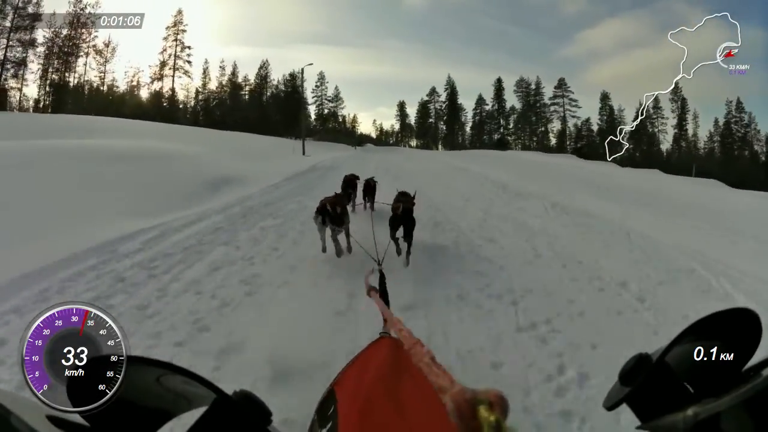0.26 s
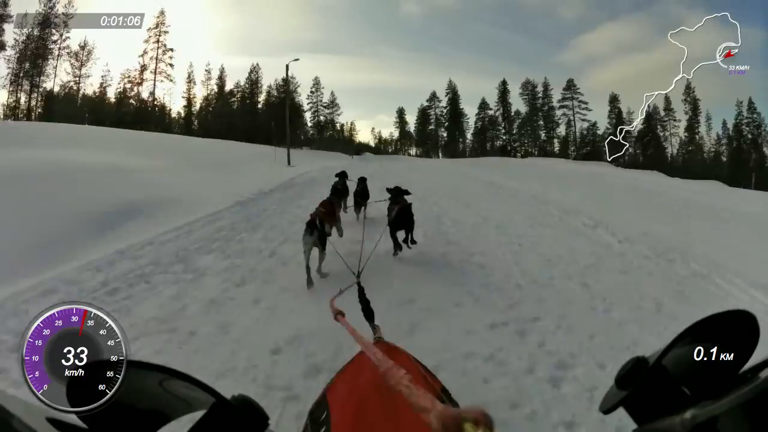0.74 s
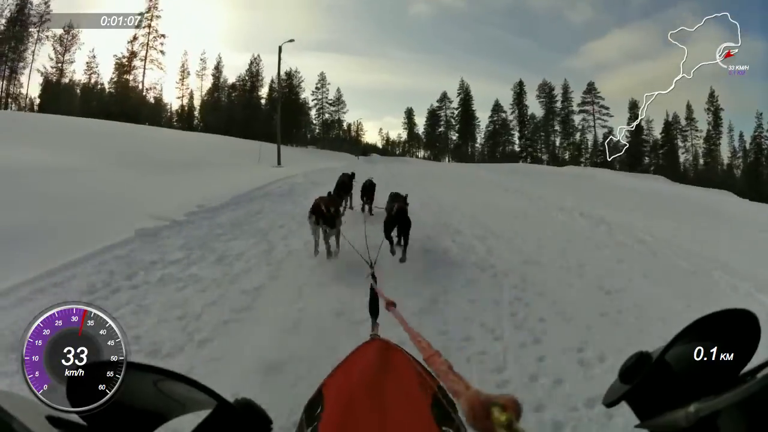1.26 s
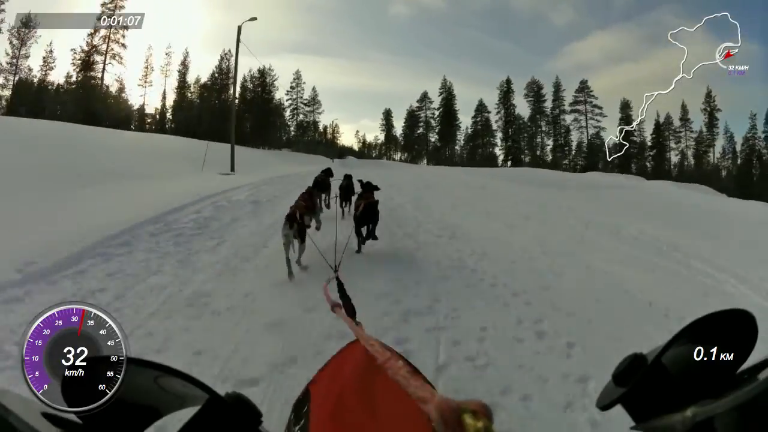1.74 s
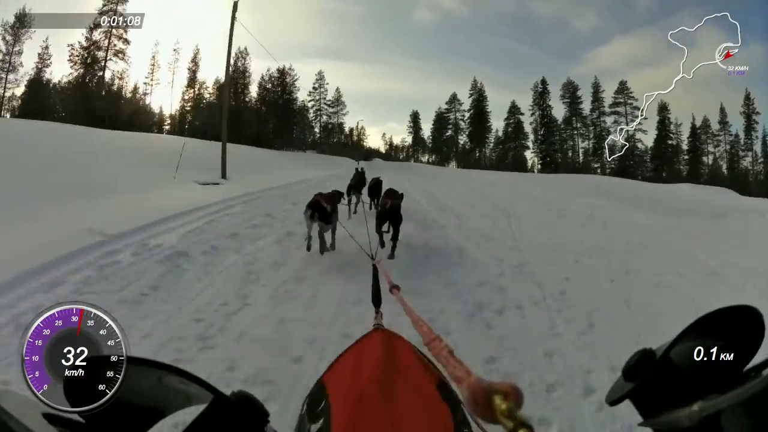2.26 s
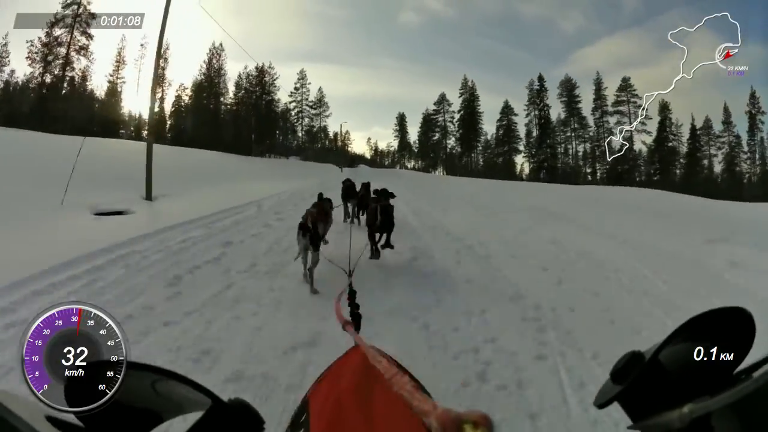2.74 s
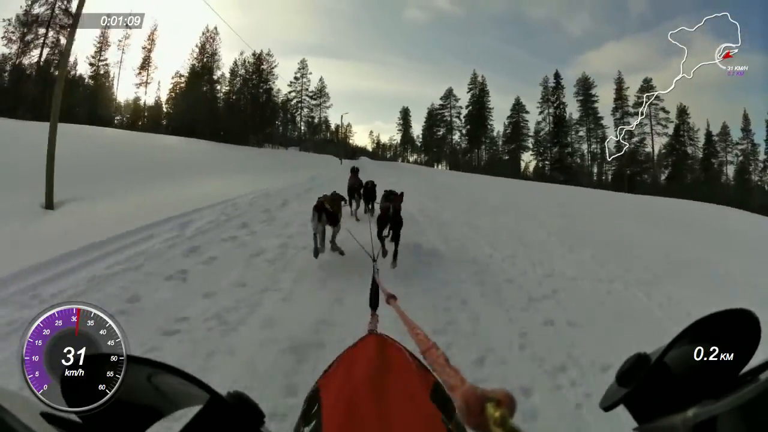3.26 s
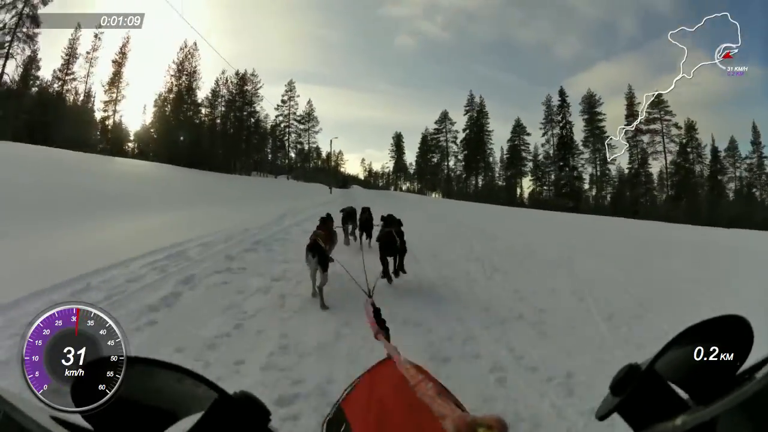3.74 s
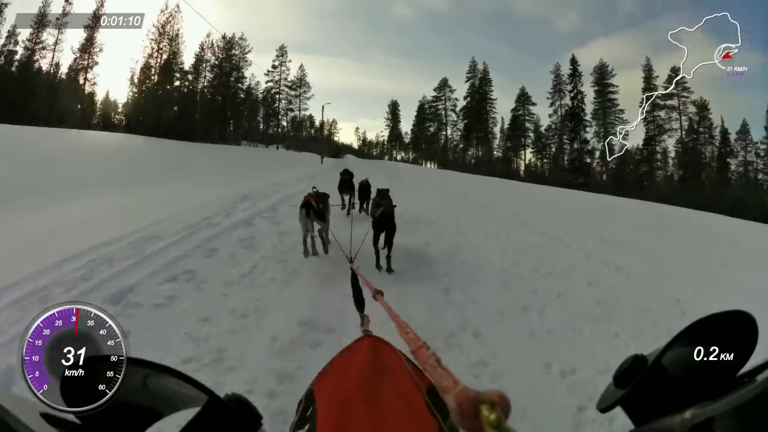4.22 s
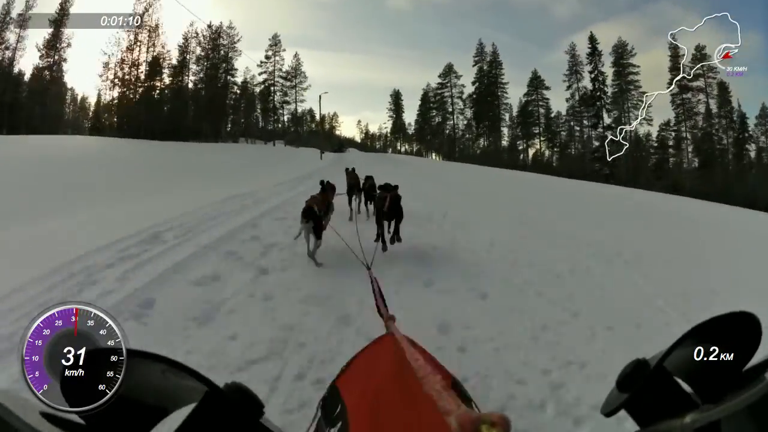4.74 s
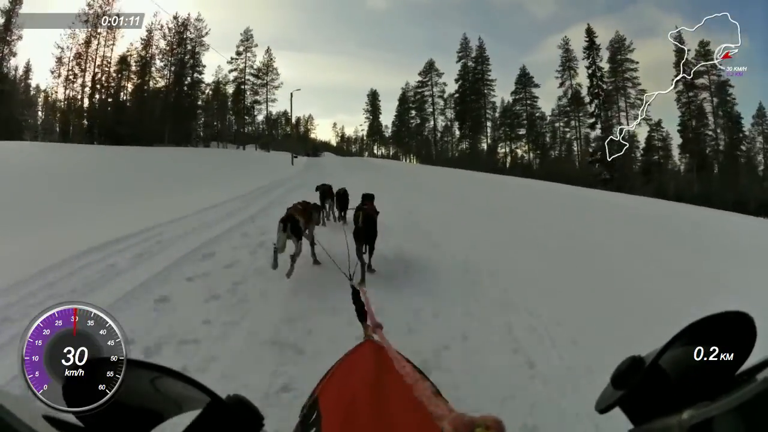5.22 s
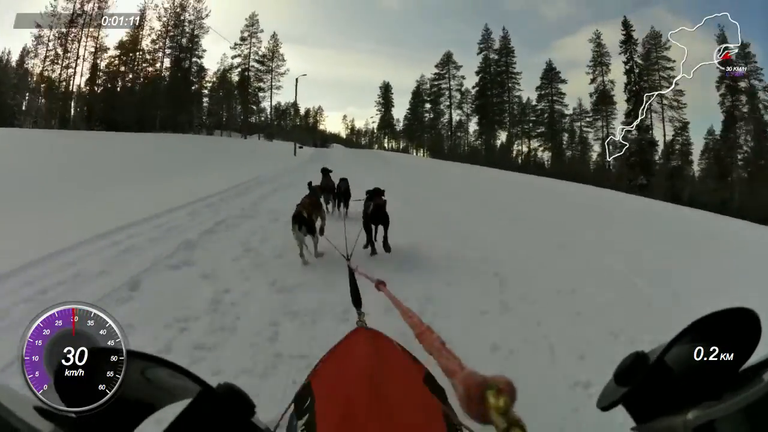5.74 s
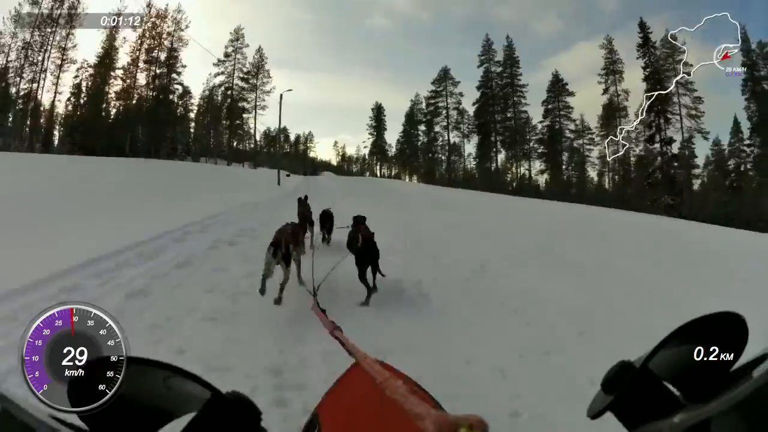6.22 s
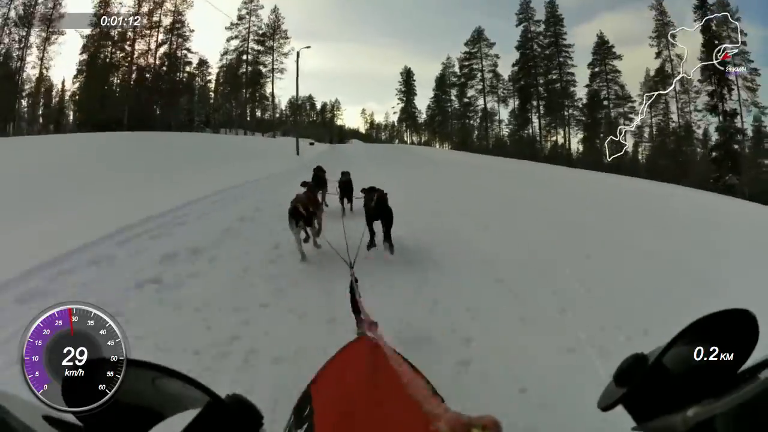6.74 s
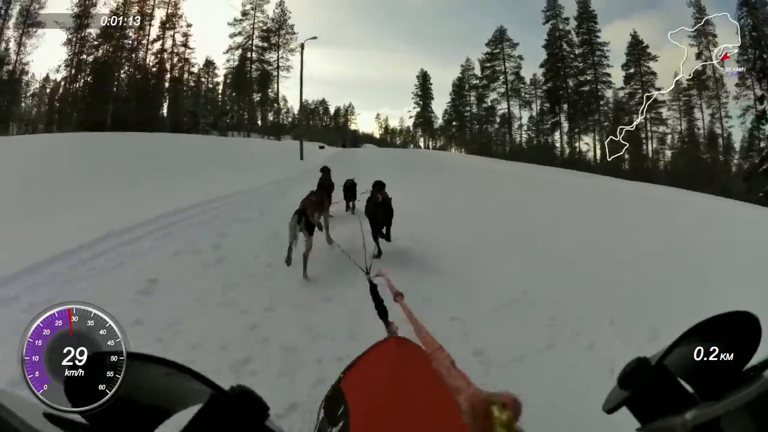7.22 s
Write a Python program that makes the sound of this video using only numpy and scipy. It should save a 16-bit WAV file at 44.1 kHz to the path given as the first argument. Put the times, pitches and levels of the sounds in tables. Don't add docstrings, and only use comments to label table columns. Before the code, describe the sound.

A dog sled races over a packed snow trail, heard from a sealed camera mounted on it. A dull, uneven rumble runs throughout, with gritty scraping and fine crackle. Loose fittings tap, the wooden frame raps, and ice chips tick on the case. Bumps grow harder and denser in the second half, some thumping into distortion, up to heavy slams at the end.

```python
import sys
import numpy as np
from scipy import signal
from scipy.io import wavfile
from scipy.ndimage import uniform_filter1d

SR = 44100
rng = np.random.default_rng(int(sys.argv[2]) if len(sys.argv) > 2 else 0)


def field_ratio(decibels):
    return 10 ** (np.asarray(decibels, dtype=float) / 20)


def unload_wav(signal):
    wavfile.write(
        sys.argv[1],
        SR,
        np.round(np.clip(np.atleast_2d(signal).T, -1, 1) * 32767).astype(np.int16),
    )


N = 329868

# pitch_hz, width_hz, level_db
BODY = [(1146, 525, 3.5), (1658, 93, 1.5), (2182, 380, -3), (2900, 190, -19)]
# pitch_hz, width_hz, level_db
TOP = [(3770, 1460, 2.5), (4460, 260, 4.5), (5400, 950, -1.5), (7050, 360, -30)]
# crest_s, peak_db, pitch_hz
BUMPS = [(0.1029, -6, 325), (1.0114, -6.5, 215), (1.3668, -3, 340), (1.4052, -7, 327), (1.6788, -1, 256),
         (2.286, -8, 364), (2.2998, -0.5, 279), (2.4176, -5, 356), (2.6999, -5, 379), (2.7184, -2, 480),
         (5.3403, -10, 400), (3.1448, -1, 298), (3.2303, 3.5, 254), (3.2618, -4, 249), (3.524, -8, 204),
         (3.6002, -9.5, 345), (3.6579, -4, 236), (3.927, 1, 397), (4.5734, -6.5, 226), (4.6612, -7, 130),
         (4.9402, -4.5, 426), (5.3096, 5, 288), (5.5478, 6, 210), (6.1924, -1.5, 300), (6.3013, -4.5, 169),
         (6.4144, -3, 553), (6.8505, -3.5, 439), (7.1188, -0.5, 217), (7.3756, 5, 304.4),
         (7.4153, -2.5, 269), (7.4425, 7, 244)]
# trough_s, peak_db, pitch_hz
DROPS = [(0.5098, -7.5, 220), (1.5128, -0.5, 158), (3.2438, 0.5, 170), (3.7593, 0, 220), (4.277, -2.5, 400),
         (4.3907, -2.5, 320), (4.7423, -3.5, 386), (4.796, -7, 150), (1.5879, -10, 310),
         (4.751, -11.5, 120), (.992, -4, 160), (2.0765, -3, 230), (6.238, -4.5, 180), (4.469, -8, 100),
         (3.813, -3, 250), (5.5513, -3, 180), (6.1946, -2.5, 240), (4.6555, -7, 110), (8.4, -5, 200),
         (7.4298, 0, 108)]
# start_s, peak_db, struck_hz, sharp_edge_db
BLOWS = [(0.9027, -13.5, 1900, -24.5), (0.9895, -12.5, 1700, -33), (1.4115, -17, 1540, -29),
         (1.511, -22, 2700, -32), (1.5243, -8.5, 1550, -29), (1.53, -21, 1570, -38),
         (2.158, -22, 2230, -43), (2.281, -11, 1520, -18.5), (2.299, -16.5, 1847, -32.5),
         (2.413, -12, 1600, -26), (3, -12.5, 2190, -48), (3.008, -15.5, 2210, -28),
         (3.7532, -15.5, 1680, -28), (3.865, -17, 1620, -48), (3.8715, -14.5, 2200, -44),
         (3.9224, -21, 1400, -59), (4.5301, -11, 1920, -27.5), (4.7282, -4.5, 2280, -17.5),
         (4.735, -8.5, 1564, -42), (4.762, -10, 1680, -27.5), (5.1104, -16, 1720, -50.5),
         (6.4306, -7, 2460, -39), (5.546, -13.5, 1930, -39), (5.661, -7, 1650, -18.5),
         (6.193, -25, 2550, -28), (6.3052, -13.5, 1700, -28), (6.4276, -4.5, 2280, -30),
         (7.2333, -12.5, 1470, -28), (7.375, -14.5, 1620, -30), (7.4403, -10.5, 1280, -45)]
# start_s, peak_db
TAPS = [(0.7293, -24.5), (0.78, -25), (.8826, -23.5), (0.9286, -31), (1.232, -16), (1.442, -17.5),
        (1.663, -18), (1.9637, -24.5), (2.025, -26), (2.167, -25), (2.197, -19.5), (2.4054, -20),
        (2.8724, -20.5), (3.4172, -20.5), (3.632, -23.5), (3.6965, -18), (3.818, -22.5), (4.4987, -14.5),
        (4.745, -22), (5.147, -20), (5.273, -22), (5.437, -22.5), (5.449, -17.5), (5.4646, -16.5),
        (5.578, -26), (5.7396, -16.5), (6.1965, -15.5), (4.7918, -25), (7.0434, -23.5), (7.082, -19.5)]


def runners():
    load_db, grit_db, sway_db = controls()
    trail_lumps, quick_lumps = lumps(19), lumps(5.6)
    scrape_db = -39.5 + 0.94 * grit_db + 0.28 * (load_db - load_db.mean())
    fizz_db = -66.5 + 0.56 * grit_db
    crackle_db = -76 + 0.78 * grit_db
    spray_db = -83.5 + 0.7 * grit_db + 1.5 * quick_lumps
    return (field_ratio(load_db) * frame_rumble(trail_lumps, quick_lumps)
            + field_ratio(np.minimum(sway_db, -21) - 1.0) * basket_sway()
            + field_ratio(scrape_db) * grit_scrape(trail_lumps)
            + field_ratio(fizz_db) * crystal_fizz(trail_lumps)
            + field_ratio(crackle_db) * crackle()
            + field_ratio(spray_db) * snow_spray())


def controls():
    # start_s, load_db, coarseness_db, waviness_db
    trail = [(0, -17.5, 3.5, 2.5), (.3, -20.5, 3, 10.5), (.9, -18.5, 4, 1.5), (1.398, -19, -0.5, 7),
             (1.8, -19, -5, -3.5), (2.1, -20.5, 1, 9), (2.6, -17.5, -7, -3.5), (3, -19, 5, 10),
             (3.4, -18.5, -6.5, -6.5), (3.9, -18.5, 0.5, 9.5), (4.2, -17.5, -5, -14), (4.5, -21.5, -3, 7.5),
             (5.1, -18, -1, -1), (5.6, -19, 3, 4.5), (6, -19.5, -8.5, -6), (6.501, -18.5, 4, 6),
             (7, -19, -4.5, 1.5), (7.48, -20, 3, -0.5)]
    # start_s, length_s,
    # load_gained_db
    slams = [(0.096, 0.014, 4), (0.5, 0.019, 2.5), (0.994, 0.033, -1.5), (1.362, 0.08, 2),
             (2.676, 0.066, 3.5), (3.531, 0.02, 3.5), (3.926, 0.017, 6), (4.391, 0.014, 5),
             (4.667, .02, 6.5), (4.733, .015, 8.5), (4.796, 0.042, 3.5), (4.933, .02, 1.5),
             (6.122, 0.024, 2), (6.401, .02, -5.5), (7.115, .05, 1)]
    # start_s, length_s, load_lost_db
    hops = [(0.145, 0.05, 3), (1.411, 0.048, 4), (1.617, .07, 1), (2.125, 0.03, 1), (2.734, .04, 7.5),
            (2.902, 0.048, 3.5), (3.041, 0.086, 2.5), (3.254, 0.091, 2.5), (3.667, 0.065, 9),
            (3.79, .115, 8), (3.978, 0.055, 1), (2.586, 0.1, 2), (4.428, .22, 6), (4.696, .035, 9.5),
            (5.21, .045, 2.5), (6.08, .04, 3.5), (5.276, 0.022, 5.5), (5.306, .06, 5.5), (4.885, .04, 0.5),
            (6.507, 0.059, 1.5), (5.376, .12, 5.5), (6.138, 0.046, 2.5), (6.206, 0.088, 5.5),
            (6.307, .09, 8), (7.04, 0.079, 5.5), (7.154, .11, 5.5), (7.283, 0.064, 1)]
    # start_s,
    # length_s, extra_grit_db
    scuffs = [(0.007, 0.11, 3.5), (2.058, 0.1, 0), (2.3, 0.016, 13), (2.87, 0.12, -2), (2.99, 0.023, 7),
              (3.4, .06, 12.5), (4.564, 0.159, 15), (4.743, 0.12, 4), (6, 0.17, 11.5), (5.687, 0.13, 6),
              (6.276, 0.048, 10.5), (6.348, 0.2, 7), (6.47, 0.19, 2), (6.35, .05, 2.5), (2.23, .05, 3),
              (2.4, 0.052, 3), (7.25, .05, 6.5), (1.498, 0.033, 7), (4.728, 0.026, 6), (3.21, .06, 6),
              (6.8, 0.027, 10)]
    slam_edge_s, hop_edge_s, landing_s = 0.0075, 0.044, 0.013
    sway_rise_s, sway_fall_s = 0.018, 0.015

    t = np.arange(0, N + 64, 64) / SR
    s, *columns = np.transpose(trail)
    load_db, grit_db, wavy_db = (np.interp(t, s, c) for c in columns)
    for start, length, gained_db in slams:
        load_db = load_db + gained_db * stretch(t, start, length, slam_edge_s)
    for start, length, lost_db in hops:
        air = stretch(t, start, length, hop_edge_s)
        since = t - start - length
        landing = 0.2 * (since > 0) * np.exp(-abs(since) / landing_s)
        load_db = load_db - lost_db * (air - landing)
        grit_db = grit_db - 0.38 * lost_db * air
    for start, length, extra_db in scuffs:
        grit_db = grit_db + extra_db * stretch(t, start, length, hop_edge_s)
    flex_power = field_ratio(-34.5 + wavy_db) ** 2
    for s, db, hz in BUMPS + DROPS:
        kick_db = -16 + db - 6.5 * np.log2(hz / 100)
        swell = np.exp(-abs(t - s) / np.where(t < s, sway_rise_s, sway_fall_s))
        flex_power = flex_power + field_ratio(kick_db) ** 2 * swell
    return [np.interp(np.arange(N) / SR, t, c) for c in (load_db, grit_db, 10 * np.log10(flex_power))]


def frame_rumble(trail_lumps, quick_lumps):
    # pitch_hz, level_db
    frame_tone = [(59, -14), (100, -10), (151, 0), (232, 0), (345, 0), (703, -7.5), (1520, -25),
                  (1670, -25), (2260, -35), (2900, -43), (4200, -79), (6600, -120)]
    bumps = grains(per_s=2500, spread_db=2.0, upward=.75) * field_ratio(1.1 * trail_lumps + 1.5 * quick_lumps)
    bumps = bumps - uniform_filter1d(bumps, size=2000)
    under_way = np.r_[bumps[-SR:], bumps]
    return evened(signal.oaconvolve(under_way, colour(frame_tone))[SR:SR + N])


def basket_sway():
    # pitch_hz, level_db
    basket_tone = [(10, -63), (30, -28), (60, 7), (110, 14), (160, -4), (320, -77.5), (2000, -130)]
    return evened(signal.oaconvolve(rng.standard_normal(N), colour(basket_tone))[:N])


def grit_scrape(trail_lumps):
    grit = grains(per_s=7000, spread_db=3.6, upward=.5) * field_ratio(2.6 * trail_lumps + 2.0 * lumps(3.1))
    return evened(muffle(case(grit, BODY), hz=3470))


def crystal_fizz(trail_lumps):
    crystals = grains(per_s=5000, spread_db=0.6, upward=0.61) * field_ratio(1.8 * trail_lumps + 0.77 * lumps(5))
    crystals = crystals + 1.2 * grains(per_s=12, spread_db=3, upward=.5)
    return evened(muffle(case(crystals, TOP), hz=5900))


def crackle():
    # pitch_hz, width_hz, level_db
    spots = [(4570, 780, 0), (5080, 700, -5.5), (3780, 750, -2), (2240, 600, 17), (1700, 370, 23)]
    clumps = field_ratio(3 * lumps(25))
    out = np.zeros(N)
    for hz, width, db in spots:
        hits = clumps * grains(per_s=70, spread_db=3, upward=.5)
        out += field_ratio(db) * evened(ring(hits, hz, width))
    return out


def snow_spray():
    return evened(signal.lfilter(*signal.butter(3, 5200, fs=SR), rng.standard_normal(N)))


def jolts():
    out = np.zeros(N)
    for way, table in ((0.89, BUMPS), (-0.83, DROPS)):
        for s, db, hz in table:
            turns = np.arange(2200) / SR * hz - .75
            fade = np.exp(-(turns / np.where(turns < 0, .42, .7)) ** 2)
            swing = np.cos(2 * np.pi * turns) * fade
            add(out, max(s - .75 / hz, 0), way * field_ratio(db - 1.5) * swing)
    return out


def knocks():
    tap_hz = 1680

    def near(hz):
        body = [(f, 0.31 * w, level - 13.0 * abs(np.log2(f / hz))) for f, w, level in BODY]
        return body + [(hz, 700, 4.), (2980, 400, -11.5), (520, 500, -6)]

    rows = [row[:3] for row in BLOWS] + [(s, db, tap_hz) for s, db in TAPS]
    return muffle(strikes(rows, near, chatter=0.1, ms=3.56), hz=3360)


def ticks():
    # start_s, peak_db, brightness_db
    sharp = [(.2336, -44, -3), (.3785, -34, -10), (.4253, -42, 11), (1.5125, -16.5, -1), (1.6763, -32, -5),
             (.8822, -36, 3), (2.915, -41, 3), (2.1709, -33, -13), (2.355, -45, -5), (2.4176, -36, -9),
             (2.5851, -39.5, -12), (2.815, -40.5, 3), (3.062, -35, -3), (3.2296, -23, 3.5),
             (3.2431, -19, -4.5), (4.6193, -40, -12.5), (5.3078, -45, 7.5), (5.3679, -39, 2),
             (5.5469, -36, -2), (1.5287, -33, 8), (5.9954, -46, -7), (6.1929, -17.5, -1), (6.4387, -19, -7),
             (6.4609, -26, -12), (6.7758, -37.5, -11), (6.8533, -30.5, -14), (7.1356, -41, -10),
             (7.3744, -28.5, 3.5), (7.4137, -30, -5), (4.7421, -37, 0), (7.4416, -41, 7)]
    tap_edge_db, edge_bright_db = -16, -8

    def hard(bright_db):
        return [(f, 1.26 * w, level + (bright_db + 5.5) * (f > 5000)) for f, w, level in TOP]

    edges = [(s, db, edge_bright_db) for s, _, _, db in BLOWS]
    edges += [(s, db + tap_edge_db, edge_bright_db) for s, db in TAPS]
    return (muffle(strikes(sharp, hard, chatter=0.064, ms=2.8), hz=6500)
            + muffle(strikes(edges, hard, chatter=0.09, ms=2.2), hz=5900))


def raps():
    # start_s, peak_db, pitch_hz
    lumps_hit = [(0.065, -21, 630), (0.093, -12, 690), (0.857, -13, 490), (1.236, -15.5, 604),
                 (2.046, -13.5, 460), (2.133, -19, 468), (2.239, -16, 505), (2.279, -10, 446),
                 (2.366, -14.5, 509), (2.435, -11, 517), (2.675, -10.5, 493), (2.697, -12, 595),
                 (2.788, -16.5, 484), (3.522, -14.5, 486), (3.623, -20, 523), (3.921, -10.5, 573),
                 (4.161, -22, 490), (4.385, -14, 514), (4.529, -13, 1100), (4.572, -17, 692),
                 (4.676, -11, 597), (4.734, -11, 599), (4.735, -8.5, 553), (4.761, -12, 504),
                 (4.799, -12, 452), (4.925, -17.5, 740), (4.939, -13.5, 488), (5.002, -14.5, 600),
                 (5.34, -13.5, 458), (5.542, -14.5, 622), (5.66, -11.5, 521), (5.719, -13, 474),
                 (5.965, -13, 509), (6.004, -11.5, 554), (6.191, -12, 544), (6.229, -18, 550),
                 (6.363, -15.5, 535), (6.412, -8.5, 620), (6.807, -11.5, 485), (6.846, -15, 570),
                 (6.902, -15.5, 530), (7.018, -18, 544), (7.12, -15, 533), (7.232, -16, 1080),
                 (7.373, -10, 467)]
    width_hz = 220

    def wood(hz):
        return [(hz, width_hz, 0), (1.64 * hz, 2.26 * width_hz, -7)]

    return muffle(strikes(lumps_hit, wood, chatter=.12, ms=5.1), hz=2070)


def chips():
    # start_s, peak_db, upper_modes_db
    flicks = [(0.9802, -27.5, -11), (1.1824, -43, -7), (1.2047, -40, -8), (1.4614, -45, -13),
              (1.7424, -39, -6), (1.7585, -30, -16), (1.8327, -46, -12), (1.8751, -39, -8),
              (1.9325, -36, -8), (1.9574, -36, -11.5), (1.9734, -48, -5), (2.0514, -41, -8),
              (2.0874, -41, -5), (2.1244, -39, -6), (2.4379, -31, -11), (2.7746, -39, -7),
              (2.9537, -43, -8), (3.1564, -40, -8), (3.2291, -31, -8), (3.2425, -19, -8), (3.856, -24, -15),
              (3.9589, -35, -9), (4.153, -40, -8), (4.5054, -23, -8), (4.6922, -37, -8), (5.1667, -29, -17),
              (5.275, -38, -10), (5.3547, -38, -10), (5.3892, -45, -10), (5.5184, -41, -3),
              (5.6201, -34, -8), (5.697, -36, -8), (5.7119, -38.5, -8), (5.7907, -36, -10),
              (5.837, -35, -11), (5.9763, -27, -17), (6.114, -43, -10), (6.1525, -39, -10),
              (6.1769, -25, -13), (6.29, -30, -12), (6.3784, -30, -14), (6.679, -46, -8),
              (6.8079, -32, -13)]
    # pitch_hz, width_hz, level_db
    middle = [(1700, 440, 3), (2280, 620, 4.5), (3000, 430, 0)]

    def shell(top_db):
        return middle + [(f, w, level + top_db) for f, w, level in TOP]

    return muffle(strikes(flicks, shell, chatter=0.065, ms=1.6), hz=6130)


def strikes(table, modes_for, chatter, ms):
    out, t = np.zeros(N), np.arange(-300, 1200) / SR
    for (s, db, spot), noise in zip(table, rng.standard_normal((len(table), len(t)))):
        gather = np.exp(-abs(t) * 1000 / np.where(t < 0, 0.48 * ms, ms))
        blow = chatter * noise * gather + (t == 0)
        sound = case(blow, modes_for(spot))
        add(out, s + t[0], field_ratio(db) * sound / abs(sound).max())
    return out


def case(x, modes):
    return sum((-1) ** k * field_ratio(db) * ring(x, hz, width) for k, (hz, width, db) in enumerate(modes))


def ring(x, hz, width):
    pole = np.exp((2j * np.pi * hz - np.pi * width) / SR)
    once = signal.lfilter([1 - abs(pole)], [1, -pole], x)
    return 2 * signal.lfilter([1 - abs(pole)], [1, -pole], once).real


def muffle(x, hz):
    return signal.sosfilt(signal.butter(5, hz, fs=SR, output="sos"), x)


def grains(per_s, spread_db, upward):
    when, size, side = rng.random((3, N))
    large = field_ratio(spread_db * np.minimum(-np.log(size + 1e-9), 4))
    return (when < per_s / SR) * large * np.where(side < upward, 1., -1.)


def lumps(ms):
    size = int(ms * SR / 1000)
    return evened(uniform_filter1d(uniform_filter1d(rng.standard_normal(N), size), size))


def colour(points, size=16384):
    f, db = np.transpose(points)
    log_hz = np.log(abs(np.fft.fftfreq(size, 1 / SR)) + 1)
    log_gain = np.interp(log_hz, np.log(f + 1), db) * np.log(10) / 20
    response = np.fft.ifft(np.exp(np.conj(signal.hilbert(log_gain)))).real
    return response[:size // 2] * np.hanning(size)[size // 2:]


def stretch(t, start, length, edge):
    return np.clip(np.minimum(t - start, start + length - t) / edge + .5, 0, 1)


def evened(x):
    return x / np.sqrt(np.mean(x ** 2) + 1e-20)


def add(mix, s, sound):
    part = mix[round(s * SR):][:len(sound)]
    part += sound[:len(part)]


def scene():
    mount = runners() + jolts() + knocks() + ticks() + raps() + chips()
    opening = np.minimum(np.arange(N) / SR / .002, 1)
    settle = .4 + .6 * np.sin(np.pi / 2 * opening) ** 2
    return settle * signal.lfilter(*signal.butter(2, 44, "high", fs=SR), mount)[None]


def band_limit(x):
    return signal.sosfilt(signal.butter(12, 15800, fs=SR, output="sos"), x)


def record(dry):
    limit, shelf_hz, shelf_db, hiss_db = .72, 12400, -9, -90
    loaded = dry / (1 + abs(dry / limit) ** 22) ** (1 / 22)
    top = signal.firwin(255, shelf_hz, pass_zero=False, fs=SR)[None]
    loaded = loaded - (1 - field_ratio(shelf_db)) * signal.oaconvolve(loaded, top, "same")
    hiss = evened(signal.lfilter(*signal.butter(2, 5000, fs=SR), rng.standard_normal(dry.shape)))
    return band_limit(loaded + field_ratio(hiss_db) * hiss)


dry = scene()
out = record(dry)
unload_wav(out)
```